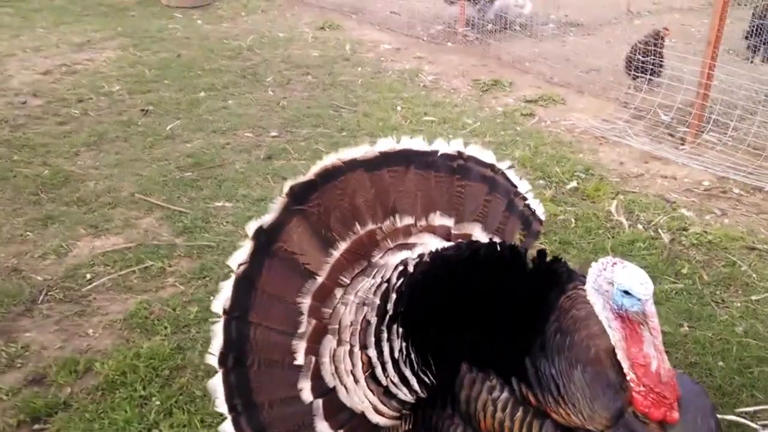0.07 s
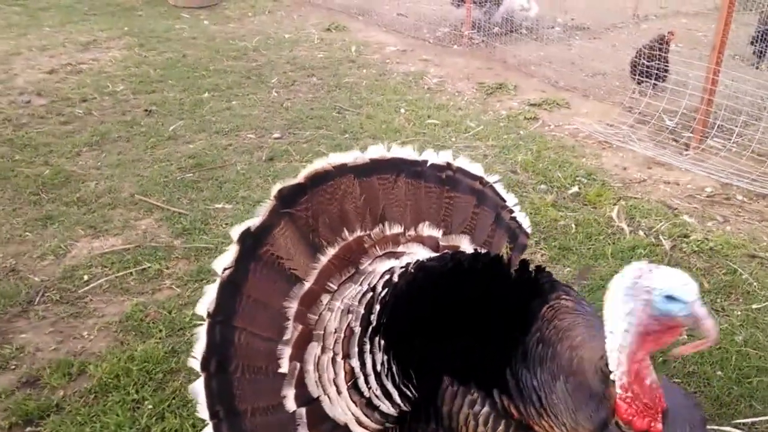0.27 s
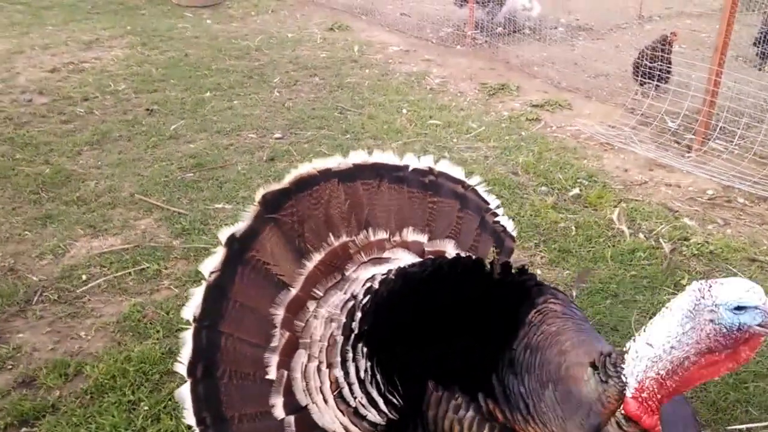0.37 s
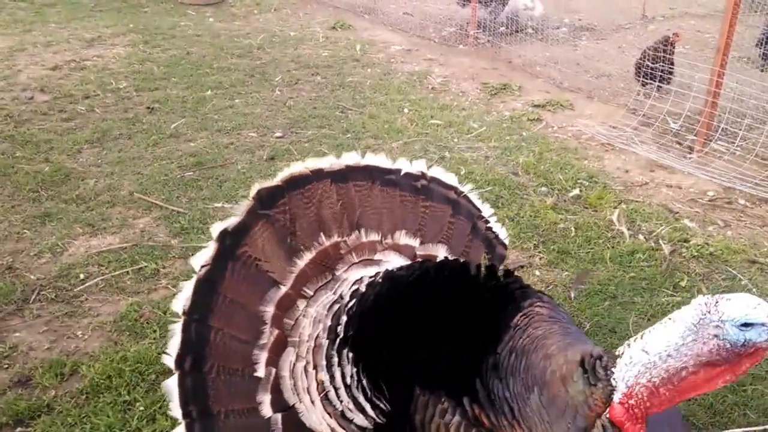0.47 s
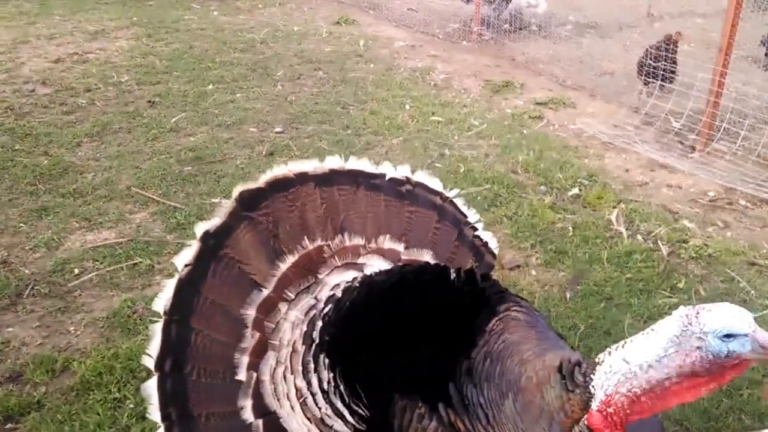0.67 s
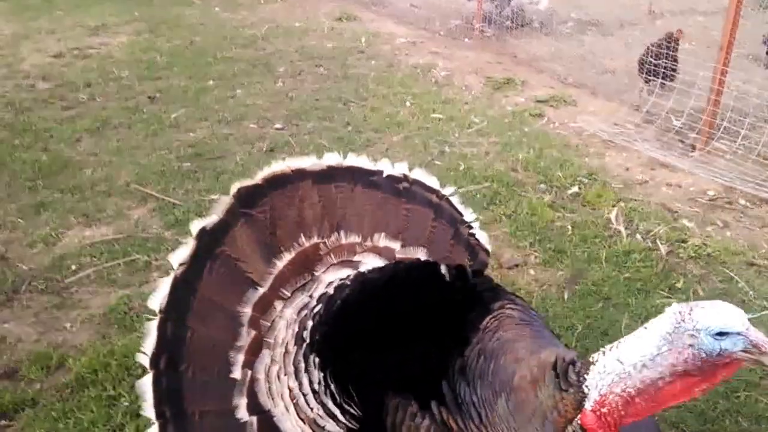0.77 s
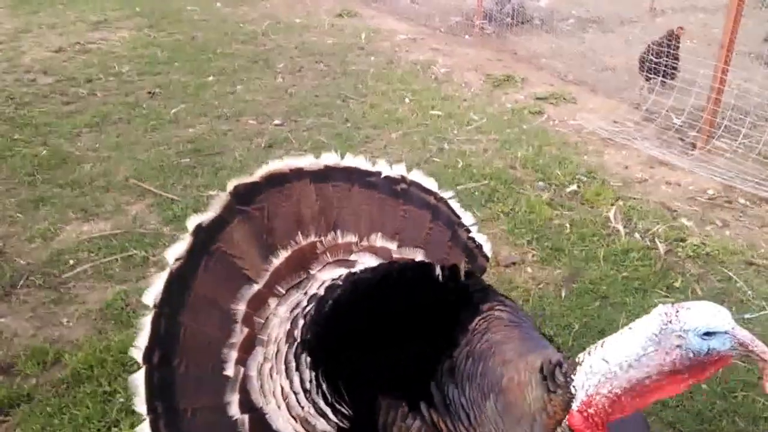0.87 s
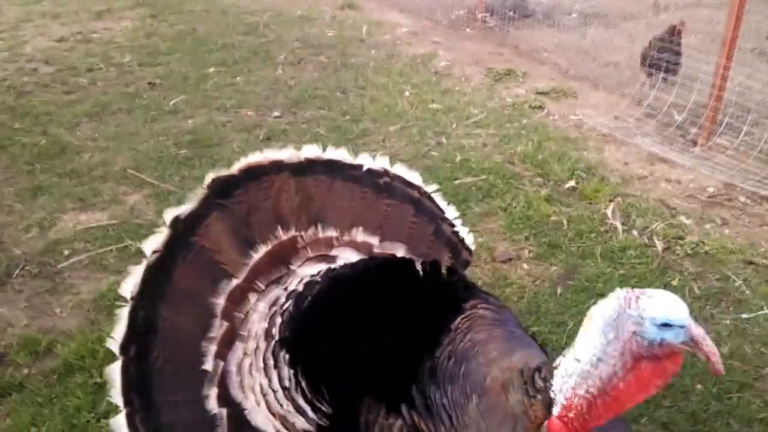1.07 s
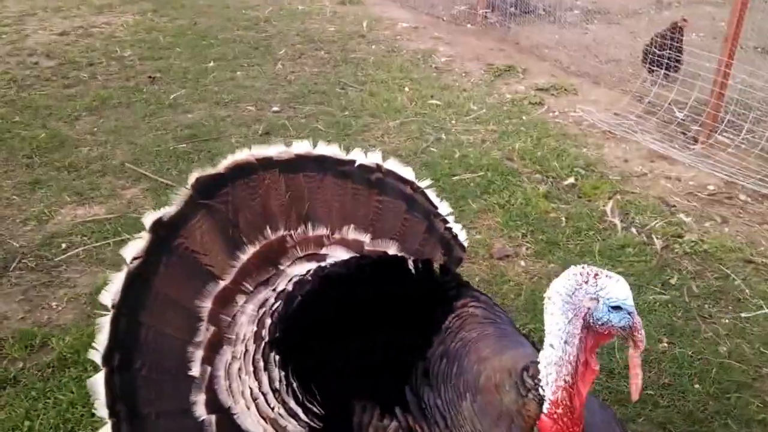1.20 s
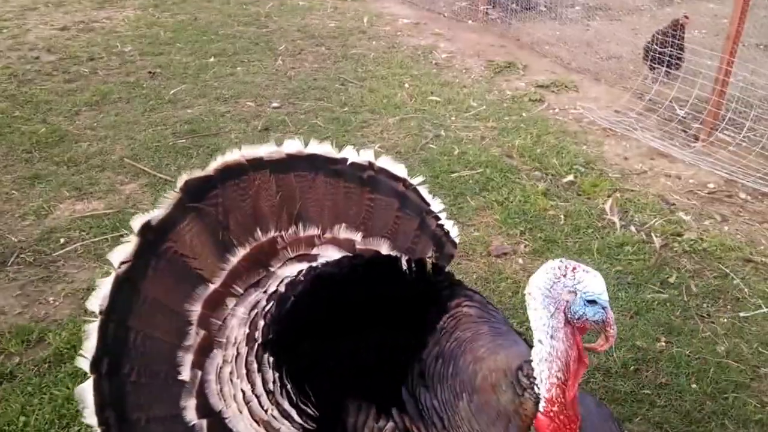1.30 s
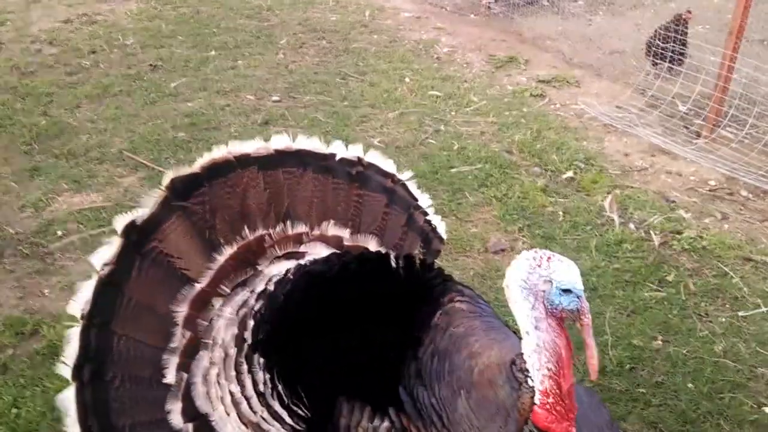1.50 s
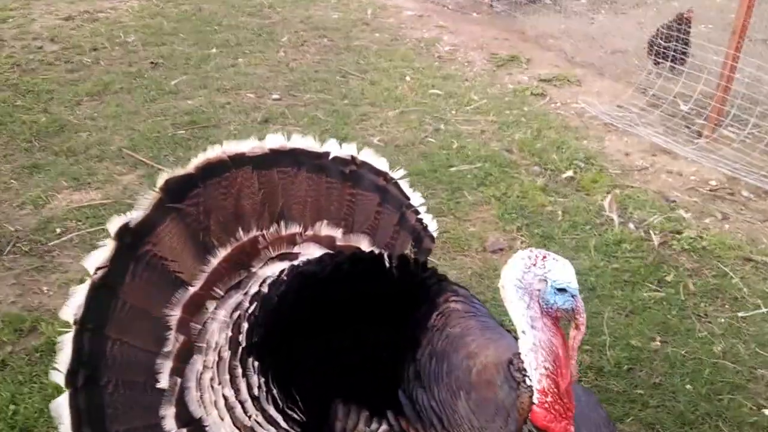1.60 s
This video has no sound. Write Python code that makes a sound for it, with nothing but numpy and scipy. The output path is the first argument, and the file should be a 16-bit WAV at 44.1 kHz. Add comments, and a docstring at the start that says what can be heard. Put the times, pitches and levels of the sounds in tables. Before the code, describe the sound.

A turkey gobbles once, loud and close, over quiet outdoor air.

```python
"""A grassy yard, where a male turkey gobbles once, close by: two hard barks from pulses in his throat, then a
tumbling run in which falling squeaks break into hollow, raspy notes. His puffed-up body throbs under the call,
and his wattle (the loose skin on his neck) and feathers flap. A fence throws back short echoes, and a rooster's
crow ends in the distance while small birds call far off over quiet outdoor air."""
import sys
import numpy as np
from scipy.fft import rfft, irfft
from scipy.io import wavfile
from scipy.ndimage import uniform_filter1d, minimum_filter1d

SR = 44100
rng = np.random.default_rng(int(sys.argv[2]) if len(sys.argv) > 2 else 0)


def file_out(sig):
    """Save sig as 16-bit WAV at sys.argv[1]."""
    # one column per channel
    cols = np.atleast_2d(sig).T
    # limit, then scale
    lim = np.clip(cols, -1, 1)
    pcm = np.round(lim * 32767).astype(np.int16)
    wavfile.write(sys.argv[1], SR, pcm)


N = 72765
T = np.arange(N) / SR
HZ = np.maximum(np.arange(N + 1) * SR / (2 * N), 1)  # the frequencies that a filter acts on
LEFT_ONLY = np.array([[1], [0]])
RASP_FOLLOWS = 0.99  # near 1: the rasp grows almost in step with the voice


def from_db(db):
    """Turn decibels into a number to multiply by."""
    return 10 ** (np.asarray(db) / 20)


def in_time(rows):
    """Join a table's rows with straight lines over time: one curve for each column after the first."""
    times, *columns = np.transpose(rows)
    return [np.interp(T, times, column) for column in columns]


def at_hz(points, hz):
    """Look up the decibels at a frequency, sliding between the table's points."""
    frequencies, db = np.transpose(points)
    return np.interp(np.log(hz), np.log(frequencies), db)


def bump(hz, centre_hz, octaves):
    """A bell-shaped curve: 1 at the centre frequency, fading away on both sides."""
    return np.exp(-(np.log2(hz / centre_hz) / octaves) ** 2)


def delay(seconds):
    """A filter that makes a sound arrive later."""
    return np.exp(-2j * np.pi * HZ * seconds)


def filtered(x, gain):
    """Turn each frequency of a sound up or down."""
    return irfft(rfft(x, 2 * N) * gain, 2 * N)[..., :N]


def noise(gain):
    """Filtered noise with a typical size of 1."""
    x = filtered(rng.standard_normal(N), gain)
    return x / x.std()


def wide_noise(gain, spread=1):
    """Stereo noise: one part shared by both sides, plus a part of its own for each."""
    return (noise(gain) + spread * np.array([noise(gain), noise(gain)])) / np.hypot(1, spread)


def drift(rate_hz):
    """A random wobble with a typical size of 1, mostly slower than the given rate."""
    return noise(1 / (1 + (HZ / rate_hz) ** 2))


def turning(hz):
    """The phase of a tone: how far it has turned, at 2 pi for each cycle."""
    return 2 * np.pi * np.cumsum(hz) / SR


def background():
    """Quiet outdoor air and a faint low hum, both made of noise."""
    air_colour = [(15, -33), (25, 4.5), (64, 1.5), (204, -7), (582, -5.5), (648, -10.5), (804, -3.5),
                  (945, -9), (1800, -11), (2700, -24.5), (3000, -21.5), (4150, -23), (5010, -30),
                  (6730, -23.5), (15500, -36.5)]  # tone of the air: f/Hz, relative level/dB
    air_levels = [(0, -39), (.1, -39), (.2, -42.5), (.7, -52), (1.2, -48.5), (1.32, -50.5), (1.45, -49),
                  (1.65, -46)]  # loudness of the air: t/s, level/dB
    hum_levels = [(1.2, -53.5), (1.33, -62.5), (1.42, -50), (1.52, -48), (1.65, -52)]  # loudness of the hum: t/s, level/dB
    air = from_db(in_time(air_levels)[0]) * wide_noise(from_db(at_hz(air_colour, HZ)))
    air = filtered(air, delay(-0.000255 * LEFT_ONLY))  # slightly earlier on the left
    hum = from_db(in_time(hum_levels)[0]) * wide_noise(bump(HZ, centre_hz=266.8, octaves=0.23))
    return air + hum


def birds():
    """Far-off calls: the end of a distant rooster's crow, then small birds; thin, wavering tones that swell and
    fade."""
    # far-off calls (first the rooster, then small birds): start/s, length/s, start pitch/Hz, end pitch/Hz,
    # level/dB
    calls = [(-.04, 0.12, 777, 840, -39), (.91, 0.039, 3020, 3020, -56), (1.21, 0.068, 3240, 2680, -59.5),
             (1.36, 0.088, 3060, 3000, -58), (1.632, 0.022, 3700, 3950, -49)]
    out = 0
    for start, length, start_hz, end_hz, db in calls:
        progress = np.clip((T - start) / length, 0, 1)
        pitch = start_hz + (end_hz - start_hz) * progress + 22 * drift(114)
        out += from_db(db) * np.sin(np.pi * progress) * np.sin(turning(pitch))
    return np.sqrt(2) * out


def yard_echoes(x):
    """Sound bounces off the fence as a few dull echoes and scatters into a short tail."""
    bounces = [(.021, -18.5), (.034, -17), (.047, -19)]  # fence echoes before dulling: delay/s, level/dB
    dulling = [(150, -20), (500, -3.5), (750, -18), (1050, -3.5), (1500, -10.5), (2500, -2), (4000, -11.5),
               (12000, -16)]  # how much the yard sends back: f/Hz, level/dB
    tail_s, tail_db = 0.49, -18
    tail = rng.standard_normal((2, N)) * from_db(-60 * T / tail_s) * (T > .008)
    tail *= from_db(tail_db) / np.sqrt(np.sum(tail ** 2) / 2)
    echoes = sum(from_db(db) * delay(seconds) for seconds, db in bounces)
    return filtered(x, (echoes + rfft(tail, 2 * N)) * from_db(at_hz(dulling, HZ)))


def flaps():
    """Wattle and feathers make soft, dull slaps as the neck shoots out and snaps back."""
    # slaps: t/s, level/dB, rise/s, fall/s, start of the treble cut/Hz
    slaps = [(.339, -24, 0.0083, 0.0082, 280), (0.599, -37.5, 0.0054, 0.0075, 500),
             (0.736, -36, .004, 0.0068, 280), (.965, -31.5, 0.0045, 0.004, 300),
             (1.122, -22, 0.0031, 0.0069, 510), (1.135, -42.5, .002, 0.028, 670),
             (1.514, -38.5, 0.0074, 0.0062, 1130), (1.526, -33.5, 0.0014, 0.0047, 1300)]
    bass_cut_hz = 184
    out = 0
    for peak_s, db, rise, fall, treble_cut_hz in slaps:
        colour = (1 / (1 + (HZ / treble_cut_hz) ** 2) + from_db(-44)) / (1 + (bass_cut_hz / HZ) ** 4)
        swell = np.exp(-np.abs(T - peak_s) / np.where(T < peak_s, rise, fall))
        out += from_db(db) * swell * wide_noise(colour, spread=0.65)
    return out * from_db([[-2], [1.5]])  # louder on the right


def throb():
    """The puffed-up body gives off a very low tone for as long as the gobble lasts."""
    levels = [(0.2, -71.5), (0.27, -43), (0.346, -51), (0.384, -47.5), (0.456, -57), (0.52, -40),
              (0.614, -67), (0.67, -44), (1.13, -45.5), (1.25, -57)]  # strength of the throb: t/s, level/dB
    pitch_hz, left_lag_rad = 62.6, 0.85
    level = from_db(in_time(levels)[0]) * np.interp(T, [.21, .25, 1.15, 1.24], [0, 1, 1, 0])
    phase = turning(pitch_hz * (1 + 0.016 * drift(8))) - left_lag_rad * LEFT_ONLY
    return np.sqrt(2) * level * np.sin(phase) * from_db([[1], [3.5]])  # louder on the right


def rasp(phase, level):
    """Air hisses through the throat in puffs, one for each cycle of the voice."""
    colour = [(100, -10.5), (200, 3), (500, -16), (800, -1), (1200, 16.5), (2200, 8.5), (2750, -12),
              (3050, 8.5), (3750, 0), (4450, 14), (5250, -7), (6200, 7), (8000, -5.5), (9300, -0.5),
              (15500, -17.5)]  # tone of the hiss: f/Hz, relative level/dB
    puffs = 1 + .85 * np.cos(phase)
    return level * puffs * wide_noise(from_db(at_hz(colour, HZ)))


def squeaks():
    """Each squeak is a rough, high whistle that drops in two steps, usually getting louder."""
    # squeaks: start/s, length/s, high pitch/Hz, middle pitch/Hz, low pitch/Hz, opening level/dB,
    # rough closing level/dB, first drop/share of length, second drop/share of length
    whistles = [(0.474, 0.022, 1821, 1470, 1115, -34.5, -24.5, 0.36, 0.44),
                (0.52, 0.029, 1720, 1271, 1008, -24, -12.5, 0.43, 0.67),
                (0.648, 0.022, 1470, 1444, 1000, -26, -26.5, 0.1, 0.5),
                (0.692, 0.029, 1570, 1430, 952, -27, -15.5, 0.24, 0.58),
                (.826, .024, 1820, 1406, 985, -34.5, -18.5, .35, .53),
                (0.869, .031, 1553, 1402, 973, -22, -15.5, .35, .54),
                (1.038, 0.02, 1624, 1476, 976, -35, -21, 0.18, 0.47),
                (1.078, .032, 1828, 1428, 1092, -25.5, -14.5, 0.46, 0.73)]
    overtone_colour = [(1900, -27), (2900, -20), (3700, -13), (4400, -16), (5200, -32), (6300, -24),
                       (9000, -30)]  # tones above the whistle: f/Hz, relative level/dB
    edge_s, drop_s, sag_per_s = 0.018, 0.00129, 2.5
    pitch_wobble, flutter_db, rasp_db = .022, 1.5, -15.5
    out = 0
    for start, length, high_hz, middle_hz, low_hz, open_db, close_db, *drops in whistles:
        age = np.clip(T - start, 0, length)
        # each goes from 0 to 1 as its drop happens
        first, second = (.5 + .5 * np.tanh((age - share * length) / drop_s) for share in drops)
        steps_hz = high_hz + first * (middle_hz - high_hz) + second * (low_hz - middle_hz)
        pitch = steps_hz * (1 - sag_per_s * (age - length / 2))
        phase = turning(pitch * (1 + pitch_wobble * drift(258)))
        inside_s = np.minimum(T - start, start + length - T)
        swell = np.sin(np.pi / 2 * np.clip(inside_s / edge_s + 0.39, 0, 1)) ** 2
        level = swell * from_db(open_db + (close_db - open_db) * (0.29 * first + 0.88 * second))
        overtones = sum(from_db(at_hz(overtone_colour, k * pitch)) * np.cos(k * phase)
                        for k in range(2, 7))
        voice = (np.cos(phase) + overtones * (1 - .5 * second)) * from_db(flutter_db * drift(140))
        mid_level = from_db((open_db + close_db) / 2)
        breath = from_db(rasp_db) * swell * mid_level ** RASP_FOLLOWS * (1 + .5 * first)
        out += np.sqrt(2) * level * voice + rasp(phase, breath)
    return out


def hollow_notes():
    """Each note swells, sags in pitch and dies away; its overtones and rasp fade faster than it does."""
    # notes: peak t/s, rise/s, fall/s, pitch/Hz, sag/(Hz per s), level/dB,
    # relative overtone level/dB, relative rasp level/dB, roughness/(0 to 1)
    notes = [(0.397, .016, 0.021, 545.8, 502, -21.5, -4.5, -15.5, 0.78),
             (0.426, .016, 0.017, 508.7, 726, -16, -12, -21.5, 0.21),
             (0.501, .008, .011, 539, 1210, -12.5, -1, -18, 0.06),
             (.549, .005, .028, 540, 1900, -11.5, -1, -19, .04),
             (.603, .010, 0.018, 485, 505, -29.5, 6, -17, 0.44),
             (.674, 0.0061, 0.016, 515, 1216, -14, -4.5, -21, 0.11),
             (.722, .008, 0.013, 508, 1174, -12.5, -4.5, -13.5, 0.01),
             (0.76, .004, 0.0088, 580, 3000, -24, 3, -31, 0.21),
             (0.788, .017, 0.016, 514.7, 904, -12, -5.5, -19, 0.05),
             (.856, .007, 0.014, 512.6, 613, -17.5, 4.5, -9.5, .15),
             (.899, .008, 0.013, 555, 1598, -20, 2, -27, 0.19),
             (.957, .003, 0.0076, 507.6, 4, -18.5, 0, -29, 0.67),
             (0.983, .016, 0.015, 519.5, 1401.5, -12.5, -3, -17.5, 0.16),
             (1.066, .009, 0.0091, 535.3, 797, -14, -2, -35.5, .08)]
    overtone_colour = [(900, -9.5), (1060, -6.5), (1350, -27), (1620, -16.5), (2100, -39), (2600, -23),
                       (3100, -28.5), (3750, -48), (4450, -26.5), (5200, -48), (6300, -38), (8000, -63)]  # tones above the note: f/Hz, relative level/dB
    pitch_wobble, flutter_db, fade_db_per_s = 0.0132, 5.58, 271
    growl_ratio, growl_db = 1.4, -7.5
    out = 0
    for peak_s, rise, fall, hz, sag, db, overtones_db, rasp_db, rough in notes:
        since_peak = T - peak_s
        swell = np.exp(-0.9 * np.abs(since_peak / np.where(T < peak_s, rise, fall)) ** 2.59)
        fade = from_db(-fade_db_per_s * np.clip(since_peak, 0, fall))
        pitch = hz - sag * np.clip(since_peak, -rise, 2 * fall)
        phase = turning(pitch * (1 + (pitch_wobble + .08 * rough) * drift(216.6)))
        overtones = 0
        for k in range(2, 16):
            gain = from_db(at_hz(overtone_colour, k * pitch) + flutter_db * drift(110))
            overtones += gain * np.cos(k * phase + rng.uniform(0, 2 * np.pi))
        overtones *= from_db(overtones_db) * fade * swell ** 0.12  # brighter when louder
        # a rough note carries a second, unsteady tone above its pitch
        growl_phase = turning(growl_ratio * pitch * (1 + 0.033 * drift(180)))
        growl = rough * from_db(growl_db) * np.cos(growl_phase)
        voice = (np.cos(phase) + growl + overtones) * (1 + .4 * rough * drift(180))
        breath = from_db(rasp_db) * fade * swell ** RASP_FOLLOWS
        out += from_db(db) * (np.sqrt(2) * swell * voice + rasp(phase, breath))
    return out


def barks():
    """Sharp pulses ring in the throat at a rising frequency; in a stutter every third one is strong."""
    # course of the two barks: t/s, pitch/Hz, level/dB, throat ring/Hz, stutter/(0 to 1)
    course = [(.240, 470, -52, 650, 1), (.244, 508, -11.5, 680, 1), (.260, 511.6, -10.5, 754, 1),
              (.268, 497.6, -14, 1150, 0.5), (.281, 454.3, -13, 1405, 0), (.292, 425.2, -48, 1450, 1),
              (.317, 532, -57, 1100, 0.8), (.332, 478, -16.5, 1210, 0.65), (.340, 475, -17.5, 1220, 0.15),
              (.349, 506, -4.5, 1500, .02), (.362, 502, -14, 1250, 0.1), (.371, 433, -20, 880, 0),
              (.388, 530, -60, 950, 0.1), (.400, 550, -34, 778, 0.8)]
    colour = [(150, -14), (330, 13.5), (500, 2), (680, 6), (1000, 5.5), (1500, 6.5), (2250, -1.5),
              (2650, -21), (3050, -40), (3700, 0.5), (4400, -41), (5200, -16), (6300, -17), (9000, -19.5)]  # tone of the barks: f/Hz, relative level/dB
    pitch_wobble, first_pulse_s = 0.023, .2426
    floor_db, lower_side_db, rasp_db = -10.5, -12.5, -18
    pitch, db, throat_hz, stutter = in_time(course)
    level = from_db(db) * (T > course[0][0]) * (T < course[-1][0])
    phase = turning(pitch * (1 + pitch_wobble * drift(160)))
    phase -= np.interp(first_pulse_s, T, phase)  # all the tones line up in a strong pulse here
    voice, power = 0, 0
    for k in range(1, 55):
        multiple = k / 3
        ring = bump(multiple * pitch, throat_hz, octaves=0.44)
        gain = (ring + from_db(floor_db)) * from_db(at_hz(colour, multiple * pitch))
        if k % 3:  # side tones between whole multiples of the pitch make the stutter
            gain *= np.clip(stutter, 0, 1) * (1 + .3 * drift(100))
        if k % 3 == 2:  # the side tone just below each whole multiple is weaker
            gain *= from_db(lower_side_db)
        voice += gain * np.cos(multiple * phase)
        power += gain ** 2 / 2
    return level * voice / np.sqrt(power) + rasp(phase, from_db(rasp_db) * level ** RASP_FOLLOWS)


def from_the_right(x, balance):
    """The turkey's head is to the right, so the left side is later and, at most frequencies, weaker."""
    ratio = from_db(at_hz(balance, HZ))
    sides = np.array([ratio * delay(0.0001), np.ones(N + 1)])
    return filtered(x, sides * 2 / (1 + ratio))


def scene():
    """The turkey and his echoes, with the birds and the air behind him."""
    bark_balance = [(130, -12), (500, -10), (1000, -4.5), (1500, 4), (3100, 0), (6800, -6.5), (15000, -13)]  # stereo balance of the barks: f/Hz, left minus right/dB
    run_balance = [(200, -2.5), (400, -15), (600, -9.5), (1100, -3.5), (2400, 4.5), (4400, -5.5),
                   (8100, -1), (15000, -18.5)]  # stereo balance of the run: f/Hz, left minus right/dB
    opening = from_the_right(barks(), bark_balance)
    run = from_the_right(hollow_notes() + squeaks(), run_balance)
    turkey = opening + run + flaps()
    return turkey + yard_echoes(turkey) + throb() + birds() + background()


def record(dry):
    """The microphone weakens one narrow band; a limiter holds down peaks; the highest treble is cut."""
    dip_db, dip_hz, cutoff_hz = -12, 2710, 15700
    ceiling, window = .95, int(.004 * SR)
    heard = filtered(dry, from_db(dip_db * bump(HZ, dip_hz, octaves=0.057)))
    allowed_gain = ceiling / np.maximum(np.abs(heard).max(axis=0), ceiling)
    smooth_gain = uniform_filter1d(minimum_filter1d(allowed_gain, size=window), size=window)
    return filtered(heard * smooth_gain, 1 / (1 + (HZ / cutoff_hz) ** 200))


dry = scene()
out = record(dry)
file_out(out)
```